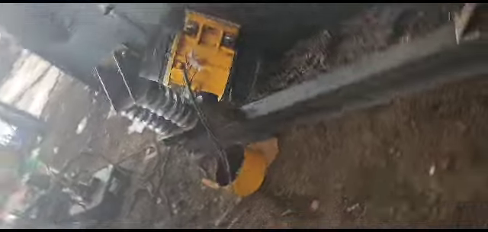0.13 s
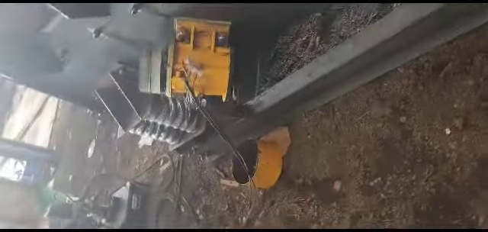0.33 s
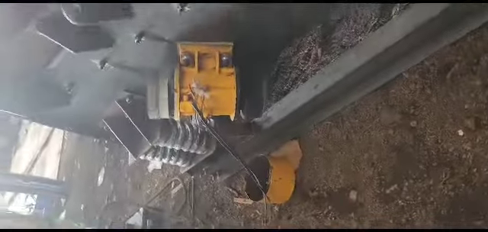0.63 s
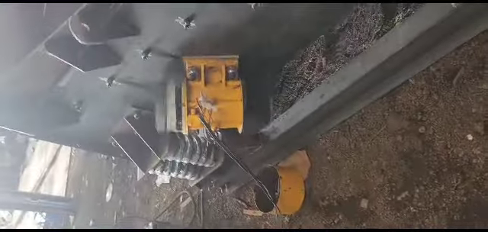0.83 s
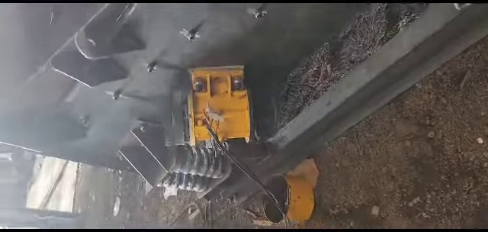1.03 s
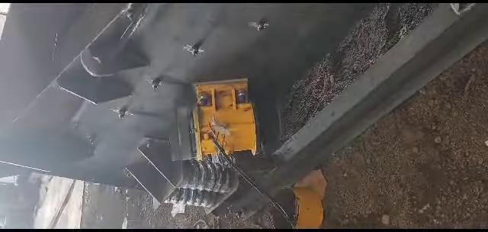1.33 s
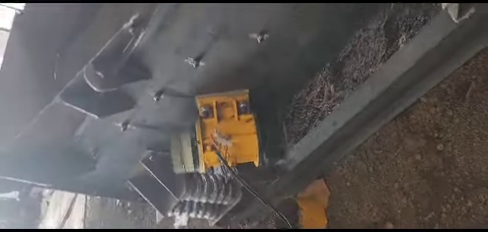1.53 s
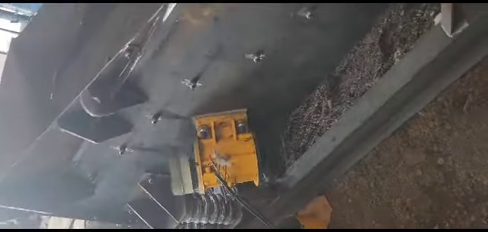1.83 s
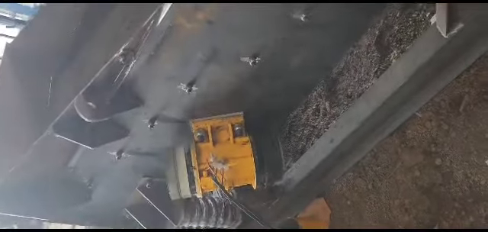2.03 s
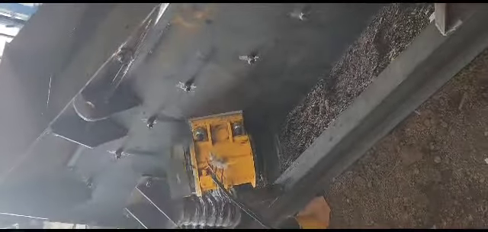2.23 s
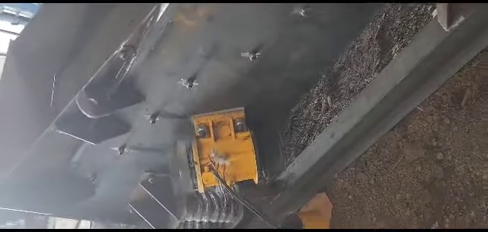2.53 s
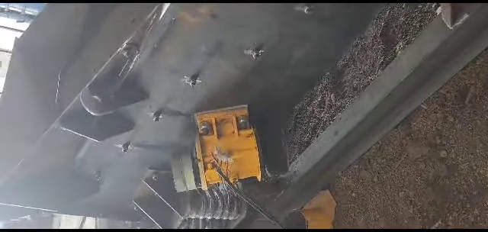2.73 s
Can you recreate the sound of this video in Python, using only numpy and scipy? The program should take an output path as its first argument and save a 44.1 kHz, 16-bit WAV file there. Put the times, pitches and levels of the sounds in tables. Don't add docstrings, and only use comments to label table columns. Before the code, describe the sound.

A vibrating steel hopper drones and clatters harshly. After under 0.1 s of silence it cuts in at full level and continues to the end at about 17 pulses a second. Each pulse has a plate slam and rebounds, scrap rattle and sizzling grit over a low boom. The ringing balance shifts slightly. Bright clinks come at 1.1-1.2 s and 1.4 s, a faint one near 2.65 s.

```python
import sys
import numpy as np
from scipy import signal
from scipy.fft import rfft, irfft
from scipy.io import wavfile
from scipy.ndimage import uniform_filter1d

SR = 44100
rng = np.random.default_rng(int(sys.argv[2]) if len(sys.argv) > 2 else 0)


def dump(signal):
    limited = np.clip(np.atleast_2d(signal).T, -1, 1)
    pcm = np.round(limited * 32767).astype(np.int16)
    wavfile.write(sys.argv[1], SR, pcm)


def ratio(d):
    e = np.asarray(d, float) / 20
    return 10 ** e


N = 127008
SHAFT_HZ = 16.613

# place in the turn [0-1], level/dB, decay/s
SCRAP_JUMPS = [
    (0.94, 1, 0.009),
    (0.068, 5, 0.005),
    (0.53, 3, 0.027),
    (0.63, -4, 0.0033),
    (0.0081, -4.5, .004),
]


def colour(x, points):
    hz, db = np.array(points, float).T
    f = np.maximum(np.fft.rfftfreq(x.shape[-1], 1 / SR), 1)
    response = ratio(np.interp(np.log(f), np.log(hz), db, -80, -80))
    return irfft(rfft(x) * response, x.shape[-1])


def resonate(x, peaks):
    out = 0
    for f, width, db in peaks:
        strength = ratio(db + 0.4 * rng.standard_normal((2, 1)))
        out = out + strength * signal.lfilter(*signal.iirpeak(f, f / width, SR), x)
    return out


def set_level(x, db):
    return x * ratio(db) / np.sqrt(np.mean(x ** 2))


def walk(rate, count):
    hold = int(SR / rate)
    steps = np.repeat(rng.standard_normal((count, N // hold + 1)), hold, axis=1)
    return 0.96 * uniform_filter1d(uniform_filter1d(steps, hold), hold)[:, :N]


def pair(alike, x):
    twist = 2.43 * walk(24.57, count=1)[0, :N // 2 + 1]
    right = irfft(rfft(x[0]) * np.exp(1j * twist), N)
    return np.sqrt(alike) * np.array([x[0], right]) + np.sqrt(1 - alike) * x[1:]


def turn_gate(hits, bed_db):
    scatter_db, jitter_s = 0.7, 0.0003
    turns = np.arange(int(N / SR * SHAFT_HZ) + 1)
    power = np.full(N, ratio(bed_db) ** 2)
    for place, db, decay in hits:
        chance = rng.standard_normal((len(turns), 2))
        at = (((turns + place) / SHAFT_HZ + jitter_s * chance[:, 0]) * SR).astype(int)
        inside = at < N
        kicks = np.zeros(N)
        kicks[at[inside]] = ratio(db + scatter_db * chance[inside, 1]) ** 2
        power = power + signal.lfilter([1], [1, -np.exp(-1 / (decay * SR))], kicks)
    return np.sqrt(uniform_filter1d(power, size=30))


def turn_noise():
    memory = 0.65
    turn_len = int(round(SR / SHAFT_HZ))
    rows = rng.standard_normal((3, N // turn_len + 17, turn_len))
    rows = signal.lfilter([1], [1, -memory], rows, axis=1)[:, 16:]
    return np.sqrt(1 - memory ** 2) * rows.reshape(3, -1)[:, :N]


def drone(t):
    # shaft order, left level/dB, right level/dB
    drone_orders = [(3, -37, -37), (4, -33, -33), (5, -30, -31), (6, -29, -30), (7, -35, -35),
                    (8, -33, -33), (9, -25, -26), (10, -28, -28), (11, -35, -35), (12, -35, -38),
                    (13, -38, -41), (14, -33, -33), (15, -40, -39), (16, -24, -24), (17, -40, -37),
                    (18, -23, -23), (19, -37, -43), (20, -33, -34), (21, -32, -38), (22, -34, -39),
                    (23, -34, -34), (24, -26, -27), (25, -33, -32), (26, -34, -35),
                    (27, -42, -40), (28, -41, -43), (29, -34, -36), (30, -35, -37), (31, -30, -36),
                   (32, -42, -32), (33, -41, -31), (34, -38, -38), (35, -38, -38), (36, -43, -50),
                   (37, -32, -37), (38, -40, -39), (39, -42, -41), (40, -39, -46), (41, -33, -33),
                   (42, -25, -33), (43, -29, -31), (44, -32, -41), (45, -29, -30), (46, -31, -30),
                   (47, -30, -31), (48, -34, -31), (49, -38, -36), (50, -38, -40), (51, -45, -45),
                   (52, -35, -43)]
    push = [(3, .08, 0, 0), (6, .88, -.14, .05), (8, .876, .02, .05), (13, .6, .07, .1),
            (19, .715, .27, .05), (27, .42, .11, .1), (37, .8, 0, 1.2), (60, .06, 0, 1.)]
    wander_db, wander_rad = 0.9, 0.014
    rows = np.array(drone_orders, float)
    chance = rng.uniform(-np.pi, np.pi, (len(rows), 2))
    sway, slip = walk(10.5, count=len(rows)), walk(5.5, count=len(rows))
    out = np.zeros((2, N))
    for (k, left_db, right_db), (start, apart), s, d in zip(rows, chance, sway, slip):
        place, lead, loose = next(p[1:] for p in push if k <= p[0])
        turn = 2 * np.pi * k * (SHAFT_HZ * t - place) + (k % 2) * 2 * np.pi * lead
        turn = turn + loose * start / np.pi * 2 + wander_rad * k * d
        height = k / 30.5
        lag = apart * min(height ** 3, 1) * 0.57
        gain = np.sqrt(2) * ratio(wander_db * s * (2 + height ** 2))
        out[0] += gain * ratio(left_db) * np.sin(turn)
        out[1] += gain * ratio(right_db) * np.sin(turn + lag)
    return out


def slam(ring_gain, crack_gain, stop_gain):
    # place in the turn [0-1], level/dB, decay/s
    hits = [
        (.92, -5, .002),
        (.957, 3, .0035),
        (.04, -1, .006),
        (.165, -5, .006),
        (.32, -9, .006),
    ]
    # f/Hz, level/dB
    crack_colour = [(290, -56), (500, -13), (645, -25.5), (719, -3.5), (904, -23.5), (1060, -8),
                    (3950, -18), (5220, -22.5), (9000, -27), (11700, -53), (19800, -120)]
    # f/Hz, width/Hz, level/dB
    plate_modes = [(760, 110, -1), (819, 16, 1), (953, 14, -3), (1054, 12, 5), (1100, 200, -5),
                   (1163, 12, 1), (1240, 20, -4), (1411, 16, 1), (1711, 16, -4), (1827, 14, 3),
                   (2076, 14, 1), (2200, 200, -12), (2269, 16, -1), (2321, 20, 0)]
    stop_modes = [(2120, 290, 7), (3150, 210, 8), (5140, 1250, -6)]
    trough_modes = [(2720, 23, 5), (3110, 18, -2.5), (3200, 14.2, 2), (3730, 42, 1), (4240, 41, -3),
                    (4700, 30, -5), (5015, 63, 2.5), (5490, 80, -6), (5860, 36, -15)]
    gate = turn_gate(hits, bed_db=-3.5)
    chatter = pair(0.39, turn_noise()) * gate
    blow = pair(0.26, rng.standard_normal((3, N))) * gate
    dull = colour(chatter, [(300, 2), (1500, 0), (3500, -6), (9000, -30)])
    crack = set_level(colour(blow + dull, crack_colour), -18)
    stop = set_level(resonate(blow * gate, stop_modes), -33)
    trough = set_level(resonate((chatter + blow) * gate ** 2.7, trough_modes), -34)
    plate = set_level(resonate(chatter, plate_modes), -26)
    return crack_gain * crack + stop_gain * (stop + trough) + ring_gain * plate


def scrap():
    # f/Hz, level/dB
    tick_colour = [(1760, -45), (3000, 7), (4010, -37), (5200, 2.5), (6720, -5), (7760, -16), (9740, -10),
                   (13200, -19), (15600, -10)]
    # f/Hz, width/Hz, level/dB
    modes = [(4950, 74, 1.5), (5280, 180, 0.5), (6370, 140, 0), (7170, 260, -3.5), (7630, 45, 0),
             (8100, 30, -28), (12100, 1400, -25), (13100, 360, -7.5)]
    uneven = ratio(2.0 * rng.exponential(size=(3, N)))
    grains = pair(0.13, rng.standard_normal((3, N)) * uneven) * turn_gate(SCRAP_JUMPS, bed_db=-6.5)
    return set_level(colour(grains, tick_colour), -30) + set_level(resonate(grains, modes), -31.5)


def dust():
    # f/Hz, level/dB
    sizzle_colour = [(7000, -24), (8500, -11.5), (10000, -0.5), (12500, 3), (15700, -6)]
    flutter = ratio(2.6 * walk(39.9, count=1))
    grit = rng.standard_normal((2, N)) * turn_gate(SCRAP_JUMPS, bed_db=-1.5) * flutter
    return set_level(colour(grit, sizzle_colour), -33)


def rumble():
    # f/Hz, level/dB
    boom_colour = [(12, -17), (40, 0), (130, 5), (300, 5), (450, 0.5), (750, 1), (950, 0.5), (1500, -13)]
    mid, side = rng.standard_normal((2, N)) * ratio(0.5 * walk(6.5, count=1))
    side = colour(side, [(20, -12), (200, -16.5), (500, -27), (1000, -25.0), (2000, -6)])
    return set_level(colour(np.array([mid + side, mid - side]), boom_colour), -22.5)


def clinks():
    # t/s, ring level/dB, share of the full ring time, tick level/dB
    strikes = [
        (1.1075, -26, .5, -10),
        (1.1190, -27, .6, -15),
        (1.1405, -22, 1.1, -17),
        (1.1820, -32, .6, -20),
        (1.4213, -24, .25, -8),
        (2.647, -38, .3, -22),
    ]
    # f/Hz, level/dB, t60/s
    modes = [(2266, -2, .45), (5453, -3, .3), (5992, -3, .2), (6500, -6, .1), (7620, -6, .15),
             (7693, 0, .4), (7780, -4, .2), (7960, -6, .15), (13590, -11, .14), (13900, -12, .1),
             (15470, -8, .22)]
    # f/Hz, level/dB
    tick_colour = [(2500, -14), (5500, 0), (8000, 0), (9500, -11), (12500, -12), (14000, -7), (16000, -7)]
    tick_s = 0.005
    out = np.zeros((2, N + SR))
    age = np.arange(SR // 2) / SR
    shiver, rough_db = 1.1 * walk(150, count=2), 5 * walk(120, count=2)
    for at, db, share, tick_db in strikes:
        span = slice(int(at * SR), int(at * SR) + len(age))
        burst = rng.standard_normal((2, len(age))) * np.exp(-age / tick_s)
        out[:, span] += ratio(tick_db) * colour(burst, tick_colour)
        for f, mode_db, t60 in modes:
            k = rng.integers(N - len(age))
            swing = np.sin(2 * np.pi * f * age + shiver[:, k:k + len(age)])
            fade_db = rough_db[:, k:k + len(age)] - 60 * age / (t60 * share)
            out[:, span] += ratio(db + mode_db + fade_db) * swing
    return out[:, :N]


def scene():
    # t/s, plate level/dB, scrap level/dB, crack level/dB, stop level/dB
    sway = [(.1, 4, -0.5, -1, -3.5), (.32, 3, -3.5, 0, 5), (.5, 3, -2.5, -1, -2), (.63, 4, 1, -2, -1.5),
            (1., 4.5, 1.5, -2, -5), (1.39, .5, 1, 0.5, -4.5), (1.69, -1, 2, -0.5, 0.5),
            (1.745, -0.5, -3.5, -3, -7), (1.79, 0.5, -0.5, -1, 4), (1.97, 0.5, 0.5, -0.5, 3),
            (2.2, -3.5, -0.5, -1, 5.5), (2.52, -2, 1.5, -0.5, 2.5), (2.72, -3, 2, -1, 5.5),
            (2.77, -1, 0, -1.5, 3), (2.88, 3, -0.5, -1.5, -2)]
    t = np.arange(N) / SR
    times, *columns = np.array(sway, float).T
    plate, pieces, crack, stop = [ratio(np.interp(t, times, c - c.mean())) for c in columns]
    return drone(t) + slam(plate, crack, stop) + pieces * scrap() + dust() + rumble() + clinks()


def band_limit(x):
    return signal.sosfilt(signal.butter(12, 15710, fs=SR, output="sos"), x)


def record(dry):
    # f/Hz, left minus right level/dB
    port_difference = [(1, 0), (300, 0), (1000, 0.4), (2000, 1.8), (4500, -1.1), (8500, 2), (12000, 2),
                       (22100, -9)]
    left, right = [colour(v, [(f, way * db / 2) for f, db in port_difference]) for v, way in zip(dry, (1, -1))]
    cut_in = np.clip((np.arange(N) / SR - 0.069) / 0.00037, 0, 1)  # start/s, rise/s
    mix = 1.5 * np.tanh(np.array([left, right]) * cut_in / 1.5)
    return band_limit(mix)


dry = scene()
out = record(dry)
dump(out)
```